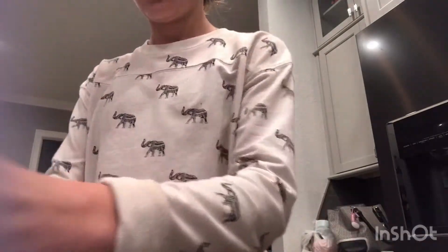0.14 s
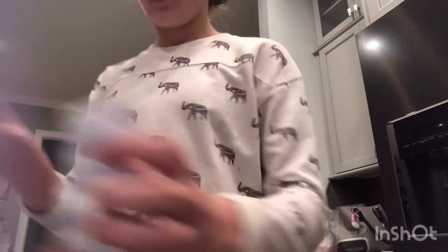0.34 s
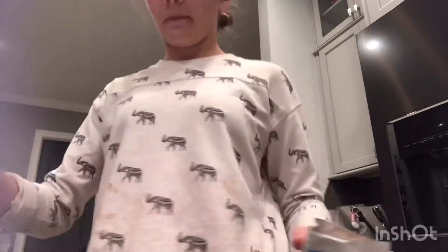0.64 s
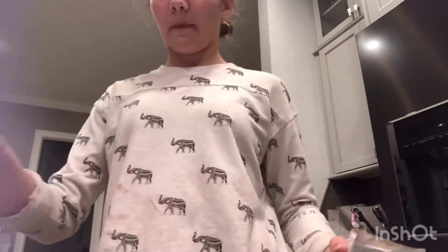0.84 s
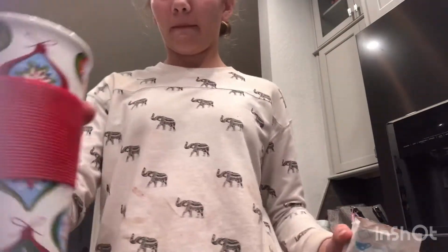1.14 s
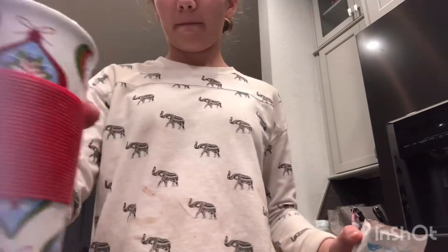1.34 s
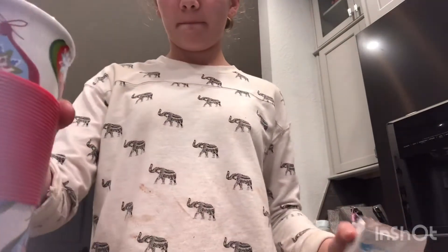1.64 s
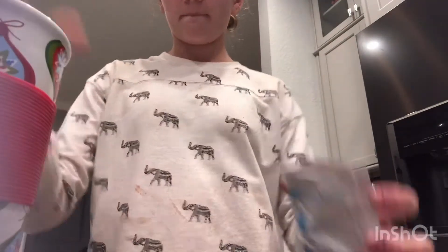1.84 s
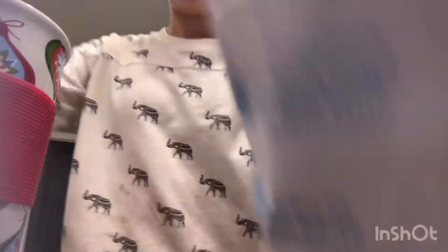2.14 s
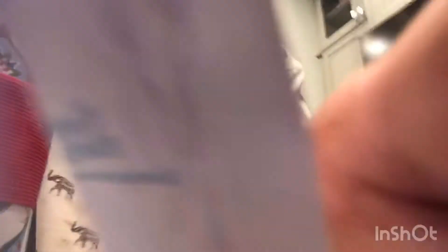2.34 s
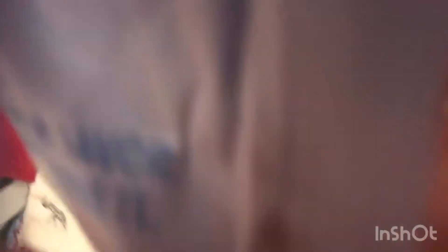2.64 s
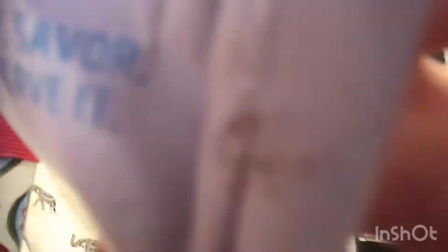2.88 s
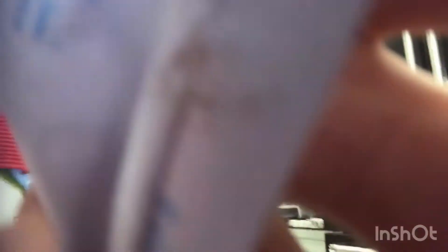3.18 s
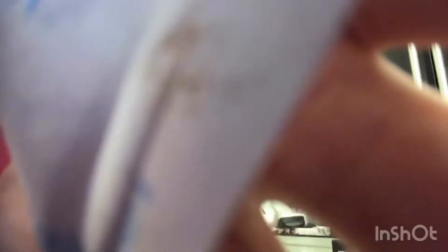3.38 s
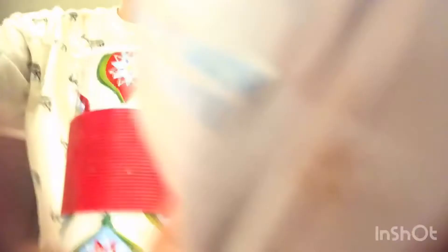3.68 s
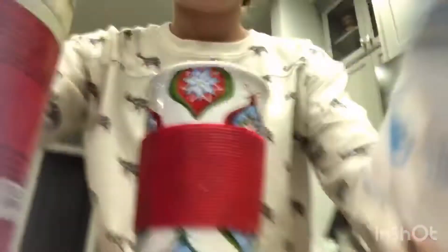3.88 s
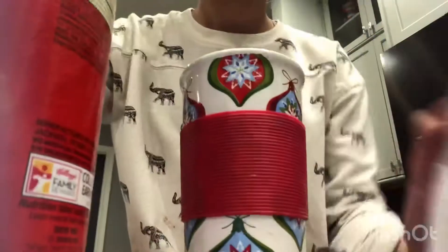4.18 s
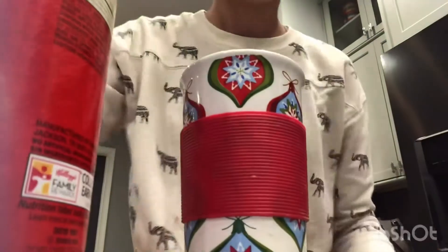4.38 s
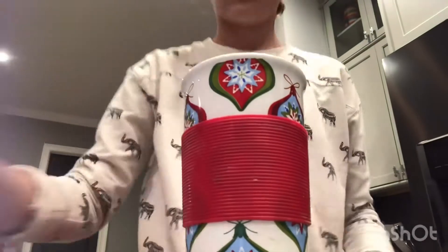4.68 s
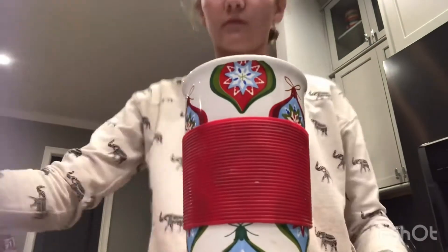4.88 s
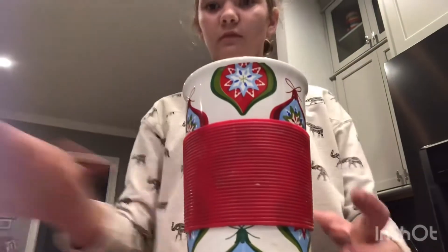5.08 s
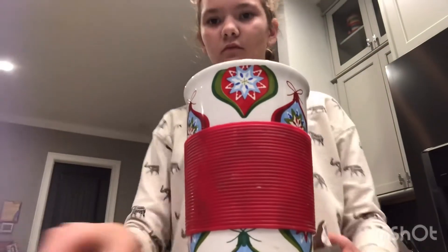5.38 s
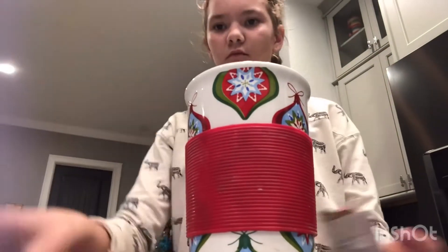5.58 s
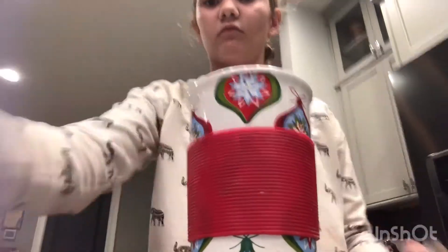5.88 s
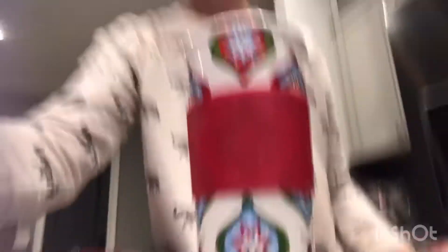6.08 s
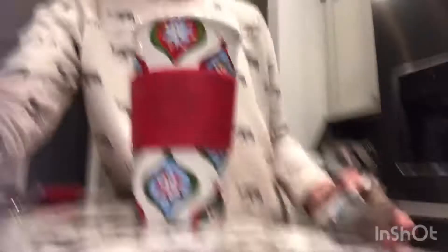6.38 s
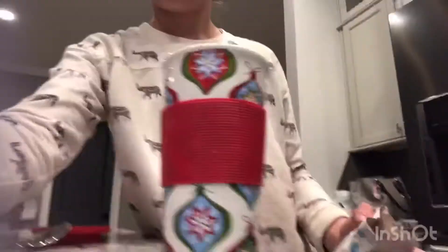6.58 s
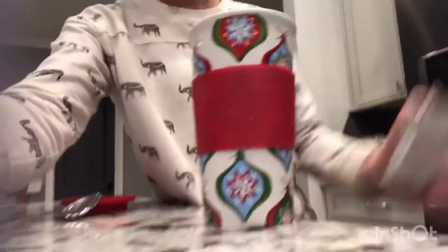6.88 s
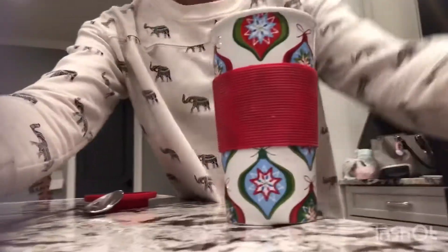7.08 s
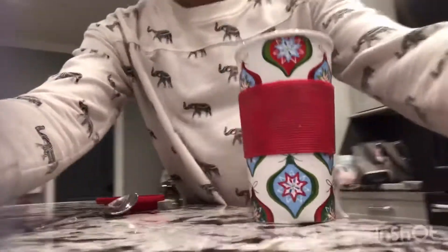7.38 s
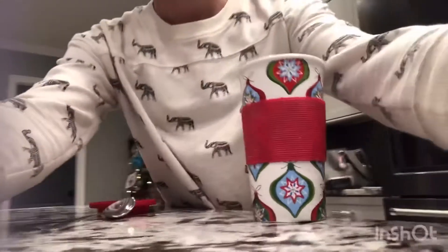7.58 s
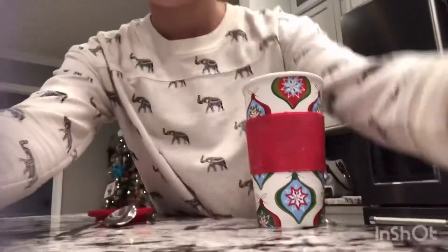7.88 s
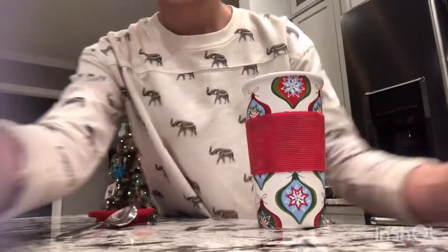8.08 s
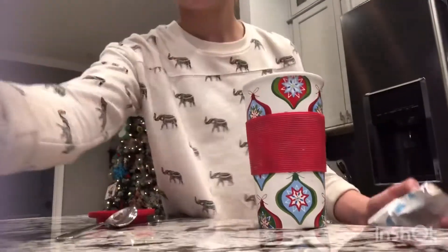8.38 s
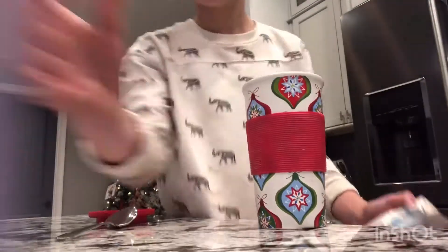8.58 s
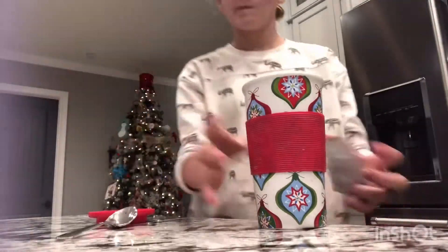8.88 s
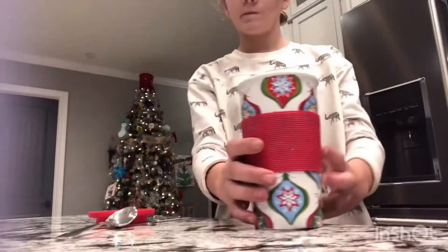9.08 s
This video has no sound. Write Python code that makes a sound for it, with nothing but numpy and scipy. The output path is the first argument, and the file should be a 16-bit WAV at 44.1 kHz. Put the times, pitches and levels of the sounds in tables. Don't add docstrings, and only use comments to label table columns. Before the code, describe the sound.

A ceramic mug clinks and lands on a stone counter, then foil crackles and hard knocks jolt the microphone in a humming kitchen

```python
import sys
import numpy as np
from scipy import signal
from scipy.fft import rfft, irfft, next_fast_len
from scipy.io import wavfile
from scipy.ndimage import uniform_filter1d

SR = 44100
rng = np.random.default_rng(int(sys.argv[2]) if len(sys.argv) > 2 else 0)


def log_audio(samples):
    frames = np.atleast_2d(samples).T
    limited = np.clip(frames, -1, 1)
    pcm = np.round(limited * 32767).astype(np.int16)
    wavfile.write(sys.argv[1], SR, pcm)


def voltage_ratio(level):
    return 10 ** (np.asarray(level, float) / 20)


N = 407043
STEP = 64

# frequency in Hz, level in dB per Hz.
HUM = [(15, -82), (25, -51), (63, -21.5), (125, -14), (172, -2), (238, 0), (330, -9), (584, -9.5),
       (766, -20), (854, -14.5), (1600, -34.5), (1930, -29), (2750, -32.5), (8600, -35.5), (15200, -40),
       (16500, -43)]
HUM_DB = -60
# frequency in Hz, level in dB per Hz.
RUMBLE = [(15, -51), (25, -21.5), (87, 4.5), (144, -8.5), (188, 0.5), (321, 1.5), (400, -3), (520, -31.5),
          (880, -120)]
DRAG = [(120, -40.5), (200, -14), (276, -2), (325, -0.5), (637, 7), (801, 4), (1510, 2), (1700, 0),
        (5000, -31.5), (6500, -37), (11000, -120)]
SWISH = [(1180, -37.5), (2000, -3), (3740, -6.5), (5470, -10), (8070, -11), (12900, -22.5), (15600, -27.5),
         (16100, -35), (16500, -48.5)]
# peak time in seconds, skin drag in dB, foil swish
# in dB, seconds to fall 20 dB.
GRABS = [(0, -53, -54, 0.15), (.2, -61.5, -63, 0.24), (.51, -59, -63, 0.24), (.9, -64, -57, 0.35),
         (1.39, -46.5, -85, 0.55), (2.12, -86, -72, 2.4), (2.44, -51, -67.5, 0.3), (2.6, -45.5, -49, 1),
         (3.42, -47, -57, 0.22), (3.69, -56, -77, 0.03), (3.751, -43.5, -49, 0.11), (4.38, -64.5, -69.5, 0),
         (4.76, -40, -45, 0.29), (5.45, -56, -67, 0.18), (5.98, -53.5, -70, 0.04), (6.12, -51, -66, 0.4),
         (6.78, -56, -60.5, 0.37), (6.97, -58, -61.5, 0.44), (7.213, -57, -54.5, 0.24),
         (7.384, -48.5, -51, 0.53), (8.47, -65.5, -60.5, 0.28), (8.83, -73.5, -65, 0.1)]
# start and end in seconds, skin drag in dB, foil swish in dB.
SLIDES = [(0.825, 1.076, -62, -66), (2.532, 3.45, -48.5, -51.5), (3.874, 4.095, -53, -57),
          (4.635, 4.812, -46, -50.5), (5.306, 5.64, -61, -65.5), (6.097, 6.554, -59, -71),
          (6.62, 7.167, -63, -70), (7.217, 7.85, -50.5, -52), (8.329, 8.603, -60.5, -68),
          (9.05, 9.3, -59, -81)]
# start and end in seconds, skin drag in dB, foil swish in dB.
SKIDS = [(2.525, 2.538, -48, -49), (2.559, 2.582, -46, -43.5), (2.726, 2.797, -47, -48.5),
         (2.932, 2.994, -42, -46.5), (3.085, 3.145, -43.5, -49), (3.18, 3.247, -44.5, -49.5),
         (4.689, 4.75, -40.5, -52), (7.342, 7.382, -41, -50.5), (7.432, 7.475, -42, -52),
         (7.696, 7.758, -47.5, -49), (7.812, 7.842, -44.5, -50.5), (7.87, 8.067, -57, -62)]
REST_DRAG_DB, REST_SWISH_DB, REST_RUMBLE_DB = -72, -79, -86.5
RUMBLE_OF_DRAG_DB, RUMBLE_OF_JOLT_DB = -16, -12
GRIP_S, SLIP_S, LET_GO_S, SETTLE_S = 0.086, 0.03, 0.13, 0.13
SKID_RISE_S, SKID_STOP_S = 0.017, 0.011

# peak time in seconds, level in dB, centre in Hz, length in seconds.
SWIPES = [(0.04, -65, 5000, 0.074), (0.182, -50, 8100, 0.042), (0.913, -39.5, 7160, 0.031),
          (0.989, -46.5, 8900, 0.049), (1.06, -51, 8700, 0.032), (1.352, -46.5, 9000, 0.052),
          (2.288, -46.5, 1700, .055), (3.643, -41, 4900, 0.02), (3.712, -38, 7000, 0.014),
          (3.738, -41, 4800, .03), (3.762, -33.5, 7760, 0.019), (4.695, -30, 610, 0.12),
          (2.96, -42, 1300, .05), (3.07, -43, 1500, .04), (4.66, -42, 3000, .1), (8.02, -50, 2300, .03),
          (8.052, -49, 2400, .03), (6.915, -54, 2300, .06), (7.135, -54, 5200, .04),
          (4.859, -37.5, 1010, .06), (6.718, -45, 2370, .07), (6.928, -55.5, 3900, 0.084),
          (6.249, -64, 8550, 0.19), (9.121, -48, 940, 0.31)]
# start
# in seconds, peak in dB, pitch in Hz.
TICKS = [(0.158, -46, 7350), (0.2224, -46, 4600), (.4775, -46, 4500), (2.395, -48, 2530),
         (2.4638, -48, 2500), (3.722, -20, 11500), (4.59, -30, 7000), (3.378, -36, 7000),
         (4.968, -41.5, 3280), (5.5254, -47, 4300), (5.944, -49.5, 2810), (5.988, -44.5, 10100),
         (6.001, -44.5, 2590), (6.135, -44, 2610), (6.1429, -46, 2500), (6.1532, -39, 2590),
         (6.1664, -36, 10400), (6.2326, -39, 9000), (6.2502, -40.5, 2300), (6.3601, -32, 10000),
         (4.621, -29, 9000), (6.7548, -41, 7000), (6.9037, -40.5, 2280), (7.233, -25, 4000),
         (7.442, -29, 3440), (7.465, -25, 2370), (7.818, -29.5, 3750), (7.186, -44, 8000),
         (8.171, -47.5, 5540),
         (1.1059, -53, 10800), (1.1446, -54, 10900), (1.1687, -59, 7130), (1.2286, -62, 5720),
            (1.268, -60, 7660), (2.556, -32, 5250), (2.6673, -17, 7820), (3.0084, -43, 8190),
            (3.1887, -36, 8000), (3.3986, -31, 6540), (3.8806, -26, 5700), (3.8874, -33.5, 8120),
            (3.9072, -38, 5960), (3.938, -12.5, 7360), (3.9799, -18.5, 5920), (4.0088, -37, 6770),
            (4.0457, -32, 5740), (4.066, -13, 6040), (4.0704, -38, 8210), (4.0973, -13.5, 5950),
            (4.6444, -22, 7650), (4.6784, -31, 5210), (4.7465, -22, 8370), (5.239, -56, 5320),
            (5.3073, -45, 12200), (5.9414, -47, 7550), (5.9814, -46, 6960), (6.0114, -57, 5740),
            (6.0841, -47, 6690), (6.1034, -49, 5360), (6.1784, -52, 7390), (6.3644, -40, 5300),
            (6.4148, -49, 5210), (6.4363, -50, 6500), (6.4757, -52, 7310), (6.5036, -45, 6400),
            (6.5889, -56, 7850), (6.6957, -51, 5490), (6.7694, -51, 8810), (6.9661, -43, 5100),
            (7.0914, -58, 6160), (7.7139, -40, 6660), (7.8654, -40, 5770), (7.9119, -43, 5670),
            (7.9514, -45, 5610), (7.9708, -31, 5000), (7.9922, -49, 5180), (8.0661, -53, 6300),
         (2.6764, -29, 1570), (3.0964, -34, 1700), (3.3323, -38, 3200), (5.4136, -25, 4990),
           (5.9614, -49, 1780), (6.0084, -48, 1720), (6.0824, -50, 1510), (6.1094, -41, 1530),
           (6.1614, -43, 2260), (6.1874, -50, 1520), (6.2158, -45, 1540), (6.2614, -47, 2190),
           (6.2694, -48, 2200), (6.349, -44, 1620), (6.3884, -47, 1580), (6.5714, -49, 1710),
           (6.6049, -53, 1580), (6.9416, -41, 2250), (6.989, -44, 2220), (7.0774, -51, 1550),
           (7.1152, -46, 2890), (7.209, -25, 1830), (7.2504, -34, 1660), (7.3414, -28, 3710),
           (7.4544, -29, 2300), (7.6765, -34, 1890), (7.7264, -35, 1820), (7.7458, -32, 2350),
           (7.8254, -29, 1530), (7.8294, -31, 2360), (7.9319, -36, 2510)]

# pitch in Hz, width in Hz, level in dB.
SPOON = [(2750, 200, -6), (3250, 350, -3.5), (3750, 350, -1), (4250, 500, 1), (5230, 400, -2.5),
         (6800, 900, -18), (11000, 900, -23)]
LID = [(5885, 1100, 0), (8100, 1500, -2), (10200, 1500, -6), (13970, 3000, -17)]
RIM = [(2830, 400, -3), (5236, 450, -2), (6650, 300, -6.5), (8350, 600, -8), (10100, 700, -5)]
# start and end in seconds, level in dB, seconds to fall 20 dB.
SPOON_RASPS = [(0.478, .486, -50.5, 0.01), (.49, .53, -48, .08), (.55, .6, -68.5, .35)]
LID_RASPS = [(3.873, 3.91, -50, .03), (3.932, 3.98, -53, .04), (4.0, 4.075, -51, .07),
             (4.14, 4.15, -53, .03)]
RIM_RASPS = [(4.672, 4.722, -46, .01), (4.784, 4.83, -56, .04), (4.915, 4.948, -62, .02)]

# start in seconds, peak in dB, body in Hz.
NUDGES = [(0.479, -28, 804), (.729, -36.5, 440), (1.323, -37, 1600), (1.4841, -26, 1200),
          (2.282, -30.5, 670), (2.609, -23, 690), (2.711, -23.5, 676), (3.073, -25, 1400),
          (3.252, -21.5, 570), (3.42, -20.5, 574), (3.472, -22.5, 507), (3.668, -25.5, 596),
          (3.87, -24, 644), (4.239, -36.5, 743), (4.281, -40, 1290), (5.968, -28.5, 605), (6.067, -36, 678),
          (6.121, -27, 970), (6.503, -34.5, 1600), (6.644, -39, 1010), (7.014, -29, 760),
          (7.179, -23, 1260), (7.228, -17.5, 610), (7.817, -20.5, 1200), (7.868, -23.5, 540),
          (7.913, -21.5, 1020), (7.962, -21, 537), (8.411, -34.5, 590)]
# start in seconds, peak in dB, body in Hz.
SNAPS = [(.914, -43, 730), (2.565, -23.5, 740), (3.644, -27.5, 3440), (3.692, -27.5, 1390),
         (3.977, -22, 886), (4.142, -37, 549), (4.626, -22, 420), (4.735, -16, 1910), (4.805, -19, 2420),
         (5.368, -38.5, 1215), (5.583, -33, 4010), (7.749, -29.5, 479), (8.328, -29, 542)]
# start in seconds, peak in dB, body in Hz, length in seconds, crack in dB relative to the peak.
KNOCKS = [(1.334, -7, 1243, .015, -34), (1.337, -18, 2430, .01, -34), (2.492, -16.5, 547, 0.023, -22.5),
          (2.582, -10, 710, .015, -19), (2.663, -18, 690, 0.047, -18), (3.221, 4.5, 3007, 0.0041, -14),
          (3.391, -1, 720, 0.017, -17), (3.755, -.5, 780, .0105, -12.5), (3.939, -29, 1380, 0.018, 11),
          (4.066, -31, 1150, 0.017, 11), (4.097, -30, 2690, 0.013, 9), (4.595, -16.5, 570, 0.014, -30),
          (4.639, -7, 620, 0.023, -19.5), (4.638, -8, 1492, 0.026, -18), (4.757, -14.5, 670, 0.024, -10),
          (4.758, -11, 2460, 0.017, -24), (5.435, -30.5, 3670, 0.0048, 1), (6.416, -21, 566, 0.022, -38),
          (6.966, -21.5, 1120, 0.016, -46), (7.2095, -15, 688, 0.055, -19.5),
          (7.336, -20, 2400, 0.017, -28), (7.366, -19, 2520, 0.025, -34), (8.486, -6, 1480, 0.0091, -28.5)]
NUDGE_S, NUDGE_CRACK_DB, SNAP_S, SNAP_CRACK_DB = 0.016, -30, 0.017, -10
CRACK_HZ, BRIGHTER = 6200, .2
HOOK = .15

# start in seconds, grind in dB, then the ring of wall, rim and foot in dB.
CLINKS = [(0.8341, -71, -49, -50.5, -56), (0.865, -46, -50, -43.5, -48.5), (0.912, -34, -61, -47, -43.5),
          (0.9901, -35.5, -49, -50.5, -44), (1.055, -36.5, -51.5, -64, -50.5),
          (1.3331, -44, -12, -37, -39.5), (1.357, -35.5, -24, -57, -51.5), (1.4863, -30, -34, -55, -42.5),
          (1.747, -39.5, -45.5, -72, -70), (5.309, -41, -42, -58, -51), (5.3348, -43.5, -54, -45.5, -61.5),
          (5.3682, -35, -64, -43.5, -63), (5.434, -17, -42, -40, -71), (5.5811, -30, -52, -48, -41),
          (9.186, -75, -53, -74, -85)]
MUG_HZ = [1630, 2680, 3790, 5280, 7080, 9352, 10700, 12210, 13550]
# level in dB, T60 in seconds.
MUG = [(-8, 0.034), (-10, 0.2), (-7, 0.05), (2, 0.042), (-5, 0.06), (-9, 0.21), (-5, 0.11), (-1, 0.042),
       (-12, .15)]
PART = [0, 0, 1, 1, 1, None, 2, 2, 2]
# start in seconds, level in dB.
PINGS = [(.878, -46), (.95, -57), (1.34, -58), (5.434, -59), (5.5994, -50)]
# start and end in seconds, level in dB.
SCRAPES = [
    (.835, .97, -65),
    (5.313, 5.5, -59.5),
    (9.058, 9.3, -73),
]

# start in seconds, peak in dB, T60 in seconds, tilt in dB per octave.
LANDINGS = [(1.333, -5.5, 0.78, 1.5), (1.483, -11, 0.71, 1), (2.28, -38.5, 0.61, -.3),
            (4.638, -9, 0.25, 0.1), (7.214, -17.5, 0.46, -1.5), (8.487, -23, 0.35, 0)]
# frequency in Hz, level in dB per Hz.
TAIL = [(88, -45.5), (150, -14), (368, -8.5), (427, -5), (781, 2.5), (856, -5), (1280, -1.5), (2720, -19),
        (3450, -33), (12000, -47), (15600, -83.5), (22000, -120)]
# start in seconds, peak in dB, pitch in Hz (the swing is 0.7 of it).
THUMPS = [(1.335, -39, 108), (2.499, -38, 109), (2.665, -34, 105), (2.949, -40, 112), (3.425, -38, 107),
          (3.465, -35, 112), (3.714, -37, 91), (3.868, -39, 104), (3.999, -44, 70), (4.617, -37, 78.1),
          (4.739, -49, 109), (5.249, -45, 107), (5.969, -51.5, 59.7), (6.081, -38.5, 109),
          (6.129, -47, 107), (6.429, -41.5, 99), (6.684, -47.5, 101), (6.888, -51, 75.4), (7.216, -27, 92),
          (7.917, -32, 95), (8.325, -48, 78.1), (8.388, -50.5, 48.4)]
TOP_HZ = 16700


def colour(x, points):
    hz, db = np.transpose(points)
    size = next_fast_len(len(x))
    f = np.maximum(np.arange(size // 2 + 1) * SR / size, 1)
    gain = voltage_ratio(np.interp(np.log(f), np.log(hz), db, -120, -120))
    y = irfft(rfft(x, size) * gain, size)[:len(x)]
    return y / np.sqrt(np.mean(y ** 2))


def band(x, hz, width_hz):
    y = signal.lfilter(*signal.iirpeak(min(hz, .45 * SR), hz / width_hz, SR), x)
    return y / np.max(np.abs(y))


def ring_twice(x, hz, q):
    ring = signal.iirpeak(hz, q, SR)
    return signal.lfilter(*ring, signal.lfilter(*ring, x))


def fade(t, t60):
    return np.exp(-np.log(1000) * t / max(t60, 1 / 1000))


def add(out, s, x):
    i = max(int(s * SR), 0)
    out[i:i + len(x)] += x[:N - i]


def walk(rate):
    k = int(SR / rate)
    held = np.repeat(rng.standard_normal(N // k + 1), k)
    return 1.3 * uniform_filter1d(uniform_filter1d(held, k), k)[:N]


def grains(rate, spread_db):
    slips = np.zeros(N)
    at = rng.integers(N, size=int(N / SR * 400))[:int(rate * N / SR)]
    sizes = rng.exponential(size=N // 100)[:len(at)]
    slips[at] = voltage_ratio(spread_db * np.minimum(sizes, 3))
    return rng.standard_normal(N) * (1 + signal.lfilter([1], [1, -.985], slips))


def gesture(start, end, db, rise, fall):
    t = np.arange(0, N, STEP) / SR
    outside = np.maximum((start - t) / rise, (t - end) / fall)
    return voltage_ratio(db - 20 * np.maximum(0, outside)) ** 2


def loudness(power):
    return np.sqrt(np.repeat(power, STEP)[:N])


def hum():
    return voltage_ratio(HUM_DB - 0.5 + 0.98 * walk(6.4)) * colour(rng.standard_normal(N), HUM)


def effort(column, rest_db):
    slides = sum(gesture(a, b, db[column], SLIP_S, LET_GO_S) for a, b, *db in SLIDES)
    skids = sum(gesture(a, b, db[column], SKID_RISE_S, SKID_STOP_S) for a, b, *db in SKIDS)
    grabs = sum(gesture(s, s, db[column], GRIP_S, fall) for s, *db, fall in GRABS)
    return voltage_ratio(rest_db) ** 2 + slides + skids + grabs


def crackle(points, low_hz, count, rate, spread_db, patch_db):
    hz_points, db_points = np.transpose(points)
    out = np.zeros(N)
    for hz in low_hz * 2 ** (np.arange(count) / 3):
        spot = ring_twice(grains(rate, spread_db), hz, 3.5)
        level = np.interp(np.log(hz), np.log(hz_points), db_points)
        out += voltage_ratio(level + patch_db * walk(30)) * spot
    return out / np.sqrt(np.mean(out ** 2))


def rubbing():
    skin = effort(column=0, rest_db=REST_DRAG_DB)
    foil = effort(column=1, rest_db=REST_SWISH_DB)
    jolts = sum(gesture(s, s, db + RUMBLE_OF_JOLT_DB, 0.046, SETTLE_S) for s, db, hz in THUMPS)
    case = voltage_ratio(REST_RUMBLE_DB) ** 2 + voltage_ratio(RUMBLE_OF_DRAG_DB) ** 2 * skin + jolts
    grip = walk(70)
    rumble = loudness(case) * voltage_ratio(3.1 * walk(15)) * colour(rng.standard_normal(N), RUMBLE)
    skin_spots = crackle(DRAG, 250.6, count=12, rate=130, spread_db=3.4, patch_db=2.6)
    drag = loudness(skin) * voltage_ratio(2.2 * grip) * skin_spots
    foil_spots = crackle(SWISH, 2380, count=9, rate=130, spread_db=3.4, patch_db=2.1)
    swish = loudness(foil) * voltage_ratio(1.9 * grip) * foil_spots
    return rumble + drag + swish


def swipes():
    out, rub = np.zeros(N), grains(200, 3)
    for s, db, hz, length in SWIPES:
        t = np.arange(-length, 2 * length, 1 / SR)
        swell = np.exp(-(t / np.where(t < 0, 0.081 * length, 0.56 * length)) ** 2)
        grit = rub[int(s * SR / 2):][:len(t)]
        stroke = band(band(grit * swell, hz, 0.42 * hz), hz, 0.91 * hz)
        add(out, s - length, voltage_ratio(db + 7.0) * stroke)
    return out


def ticks():
    out, t = np.zeros(N), np.arange(SR // 40) / SR
    rows = TICKS
    for (s, db, hz), grit in zip(rows, rng.standard_normal((len(rows), len(t)))):
        click = band(grit * fade(t, 0.0062), hz, 0.36 * hz)
        add(out, s, voltage_ratio(db) * band(click, hz, min(3.2 * hz, SR / 3)))
    return out


def rasps():
    out = np.zeros(N)
    for body, rows in ((SPOON, SPOON_RASPS), (LID, LID_RASPS), (RIM, RIM_RASPS)):
        grit, tone = grains(300, 2.0) * voltage_ratio(1.2 * walk(60)), 0
        for hz, width, db in body:
            tone = tone + voltage_ratio(db) * ring_twice(grit, hz, hz / max(1.5 * width, 150))
        push = sum(gesture(a, b, db, .006, fall) for a, b, db, fall in rows)
        out += loudness(push) * tone / np.sqrt(np.mean(tone ** 2))
    return out


def knocks():
    out, t = np.zeros(N), np.arange(SR // 10) / SR
    nudges = [(*row, NUDGE_S, NUDGE_CRACK_DB) for row in NUDGES]
    snaps = [(*row, SNAP_S, SNAP_CRACK_DB) for row in SNAPS]
    rows = KNOCKS + nudges + snaps
    noise = rng.standard_normal((len(rows), 2, len(t)))
    for (s, db, hz, length, crack_db), (push, grit) in zip(rows, noise):
        cycles = hz * t + HOOK * (1 - fade(t, 0.15 * length))
        ring = np.sin(2 * np.pi * cycles) * fade(t, length) * (1 - fade(t, 0.16 * length))
        rattle = band(push * fade(t, 1.35 * length), 0.95 * hz, 0.92 * hz)
        rattle = min(length / 0.026, 1) * band(rattle, 1.13 * hz, 2.5 * hz)
        top = np.clip(CRACK_HZ * voltage_ratio(BRIGHTER * (crack_db + 11)), 1500, 13000)
        crack = band(grit * fade(t, 0.3 * length), top, 0.95 * top)
        crack = voltage_ratio(crack_db + 6.5) * band(crack, 0.86 * top, 1.1 * top)
        add(out, s + .001, voltage_ratio(db - 2.0) * (0.7 * ring + rattle + crack))
    return out


def mug():
    out, t = np.zeros(N), np.arange(SR // 3) / SR
    sizes = rng.standard_normal((len(CLINKS), len(MUG)))
    noise = rng.standard_normal((len(CLINKS), len(t)))
    for (s, grind_db, *part_db), size, grit in zip(CLINKS, sizes, noise):
        add(out, s, voltage_ratio(grind_db - 5) * band(grit * fade(t, 0.028), 5600, 7900))
        for hz, (db, t60), part, uneven in zip(MUG_HZ, MUG, PART, size):
            if part is None:
                continue
            width = np.log(1000) / np.pi / t60
            pair = sum(band(grit * fade(t, .12), f, width) for f in (hz, hz * 1.003))
            add(out, s, voltage_ratio(part_db[part] + db - 6.0 + 0.59 * uneven) * pair)
    return out


def handle():
    out, t = np.zeros(N), np.arange(SR // 3) / SR
    handle_hz = MUG_HZ[PART.index(None)]
    for (s, db), grit in zip(PINGS, rng.standard_normal((len(PINGS), len(t)))):
        add(out, s, voltage_ratio(db) * band(grit * fade(t, 0.27), handle_hz, 13))
    push = loudness(sum(gesture(a, b, db, SLIP_S, .12) for a, b, db in SCRAPES))
    grit = grains(150, 4.0) * voltage_ratio(3.0 * walk(40))
    modes = sum(voltage_ratio(db + 11.5) * band(grit, hz, 0.025 * hz) for hz, (db, t60) in zip(MUG_HZ, MUG))
    return out + push * modes


def kitchen():
    out, t = np.zeros(N), np.arange(SR) / SR
    for (s, db, t60, tilt), air in zip(LANDINGS, rng.standard_normal((len(LANDINGS), len(t)))):
        shape = (1 - fade(t, 0.0059)) * (fade(t, 0.093 * t60) + 0.27 * fade(t, t60))
        tilted = [(hz, db_hz + tilt * np.log2(hz)) for hz, db_hz in TAIL]
        add(out, s, voltage_ratio(db - 13.0) * shape * colour(air, tilted))
    return out


def thumps():
    out, t = np.zeros(N), np.arange(SR // 4) / SR
    for s, db, hz in THUMPS:
        turns = .7 * hz * (t + 0.024 * (1 - fade(t, 0.13)))
        swing = np.sin(2 * np.pi * turns) * (1 - fade(t, .02)) * fade(t, 0.094)
        add(out, s, voltage_ratio(db + 2.0) * swing)
    return out


def scene():
    hand = rubbing() + swipes() + ticks()
    contacts = rasps() + knocks() + thumps()
    ceramic = mug() + handle()
    return (hum() + hand + contacts + ceramic + kitchen())[None]


def band_limit(x):
    return signal.sosfilt(signal.butter(12, 16560, fs=SR, output="sos"), x)


def record(dry):
    x = signal.sosfilt(signal.butter(3, 42, "high", fs=SR, output="sos"), dry)
    x = signal.sosfilt(signal.ellip(14, .2, 100, TOP_HZ, fs=SR, output="sos"), x)
    mix = np.clip(x, -1, 1)
    return band_limit(mix)


dry = scene()
out = record(dry)
log_audio(out)
```